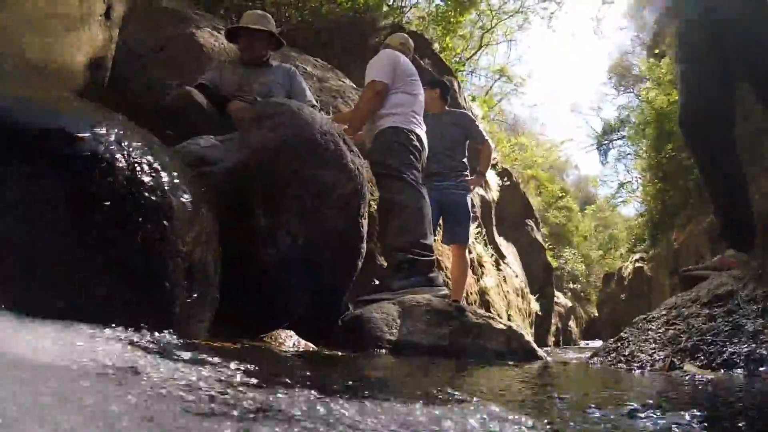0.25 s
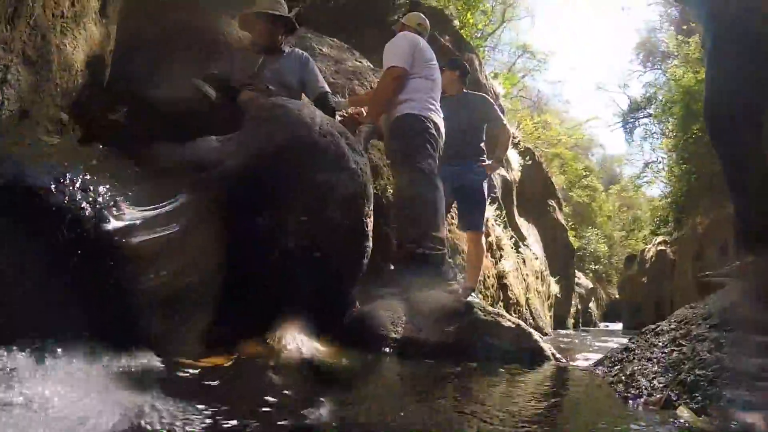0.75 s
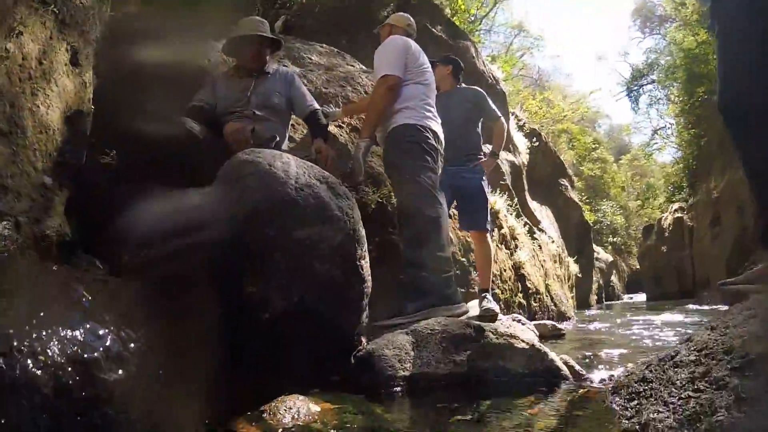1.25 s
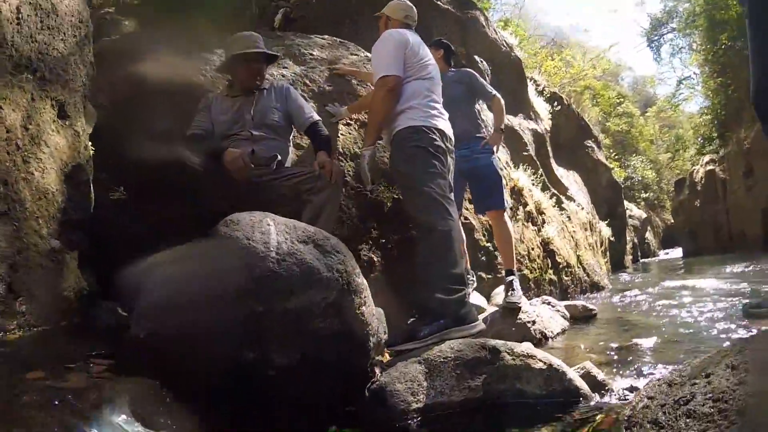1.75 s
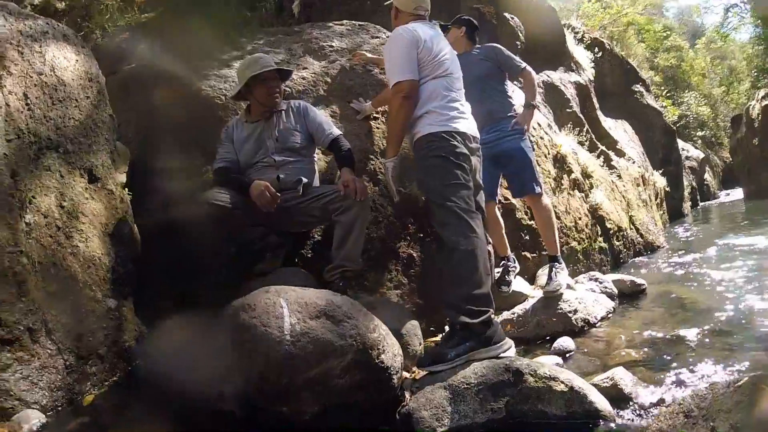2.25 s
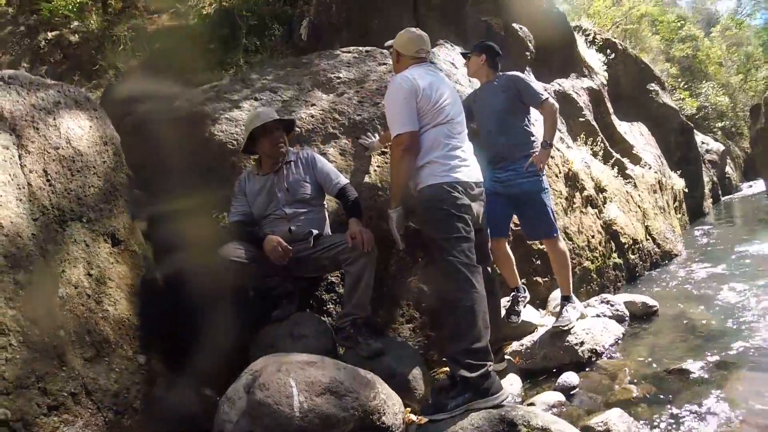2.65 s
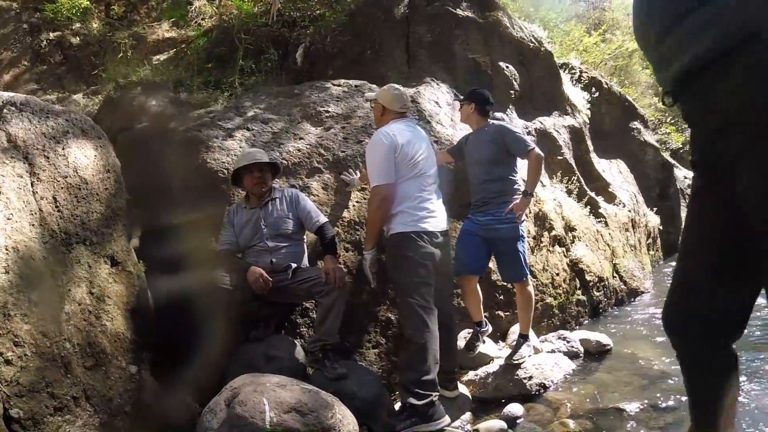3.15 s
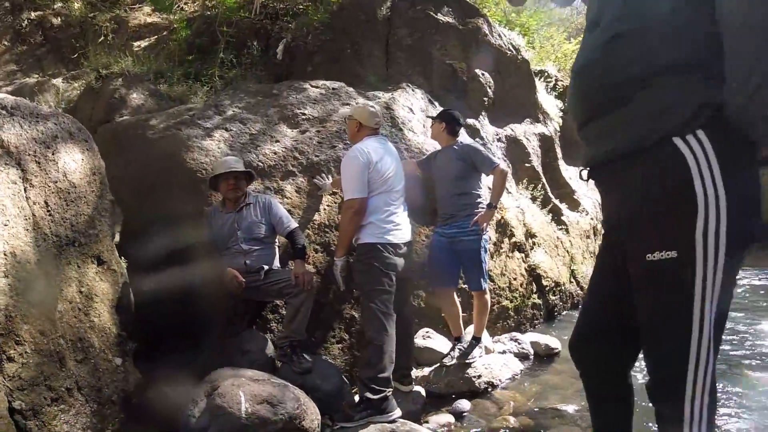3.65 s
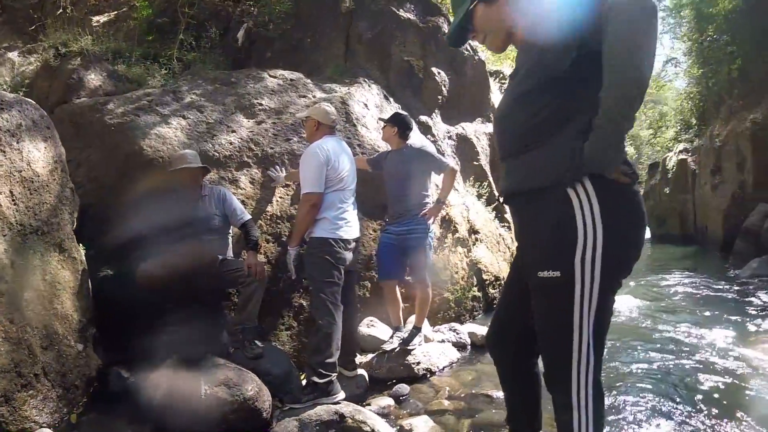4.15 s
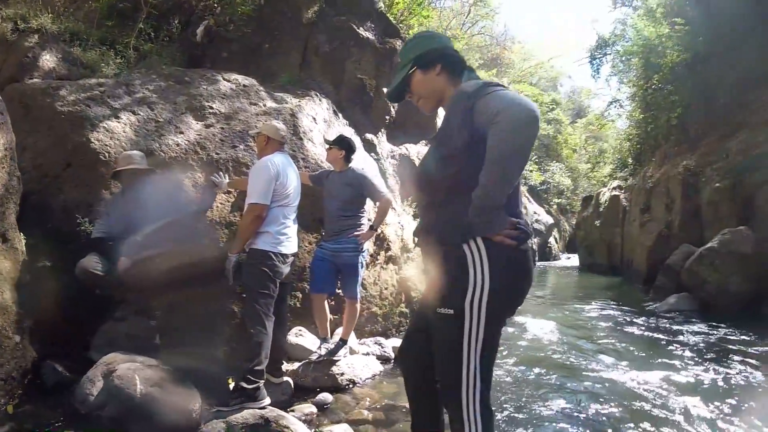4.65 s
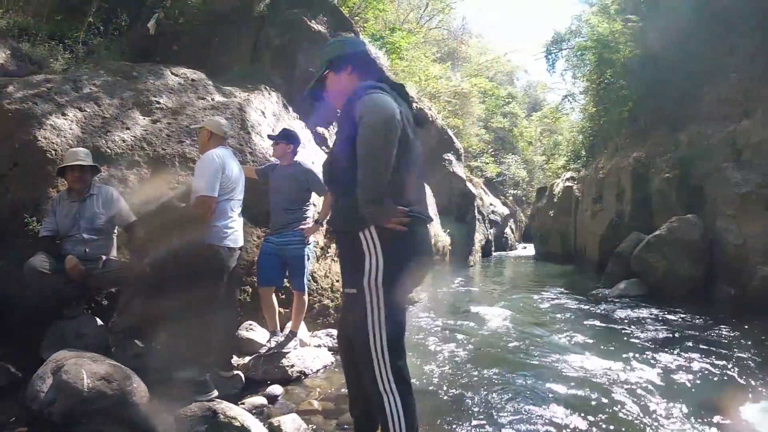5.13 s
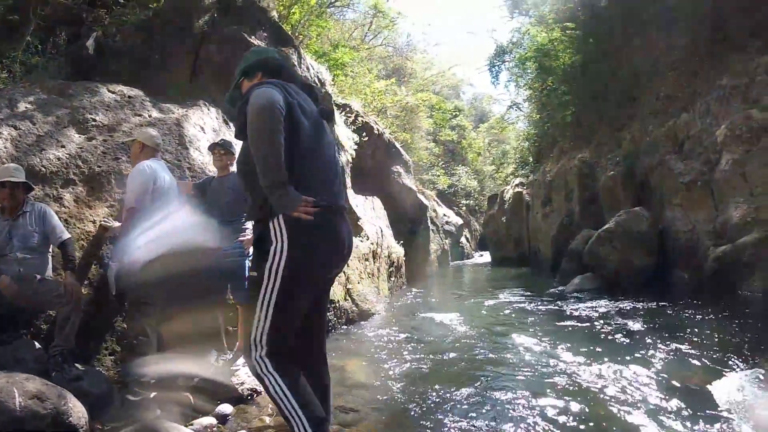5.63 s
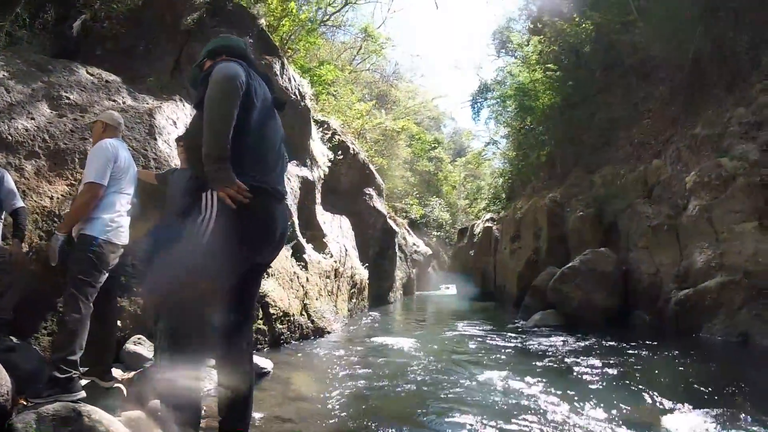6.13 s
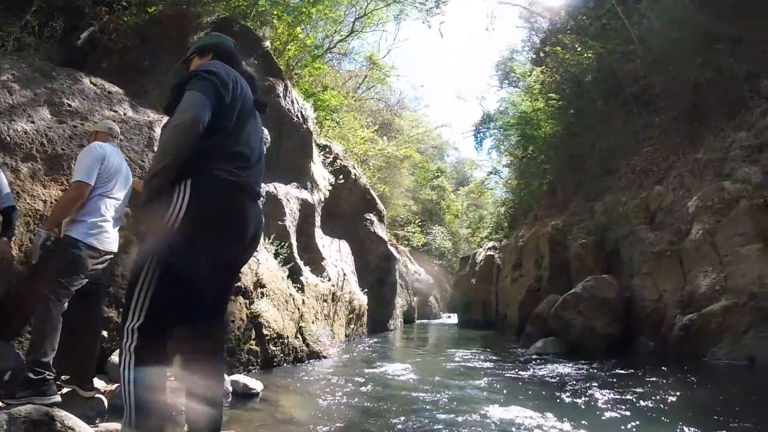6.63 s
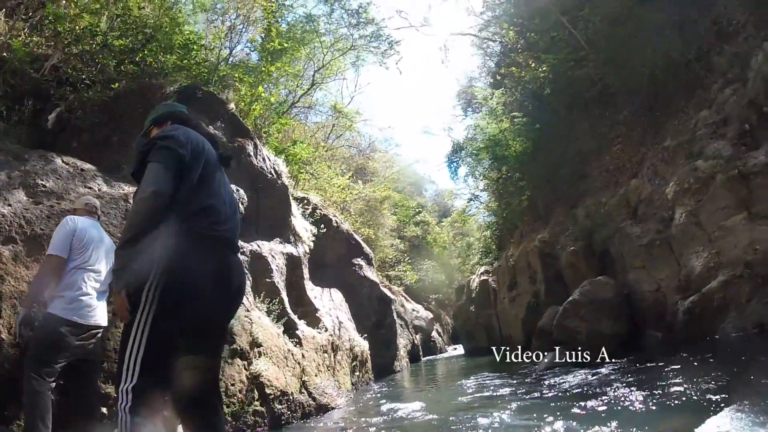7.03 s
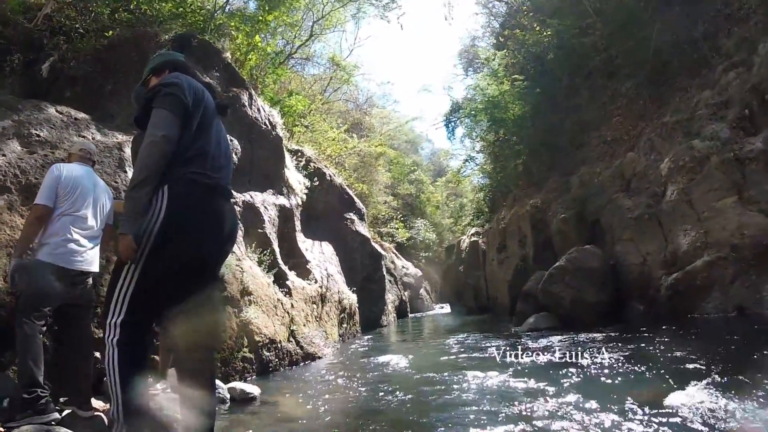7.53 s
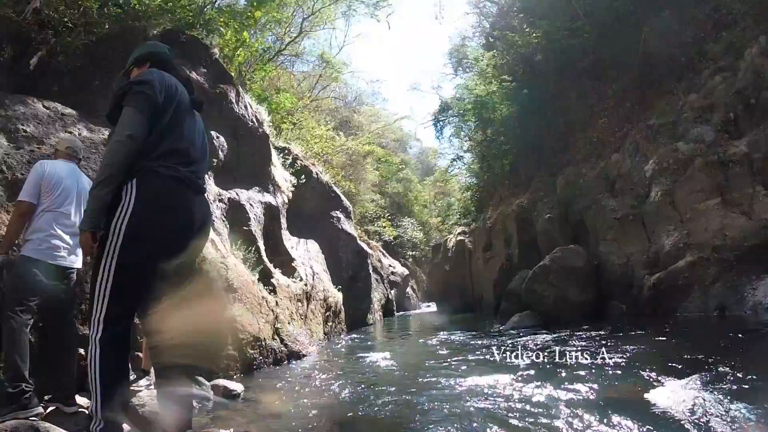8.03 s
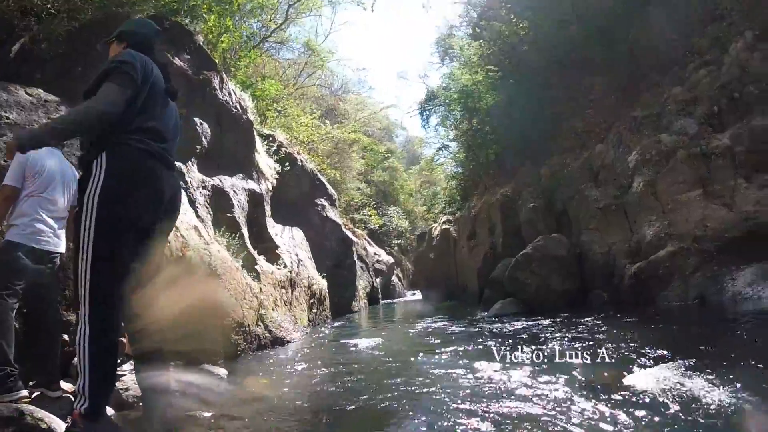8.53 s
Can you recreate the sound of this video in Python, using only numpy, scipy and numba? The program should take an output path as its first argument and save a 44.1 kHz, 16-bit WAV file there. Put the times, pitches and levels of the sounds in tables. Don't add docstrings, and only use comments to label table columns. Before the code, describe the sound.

Water-plugged microphone bubbles and rumbles dully, drains with rising hollow gurgles, then clears abruptly to airy river hiss, droplets ticking and low buffeting.

```python
import sys
import numpy as np
from scipy import signal
from scipy.fft import rfft, irfft
from scipy.io import wavfile
from scipy.ndimage import uniform_filter1d
from numba import njit

SR = 44100
rng = np.random.default_rng(int(sys.argv[2]) if len(sys.argv) > 2 else 0)


def store_pcm(level_fs):
    pcm = np.round(np.clip(level_fs, -1, 1) * 32767).astype(np.int16)
    wavfile.write(sys.argv[1], SR, np.atleast_2d(pcm).T)


def field_ratio(decibels):
    return 10 ** (np.asarray(decibels, dtype=float) / 20)


N = 387192
OPEN_S, BURST_S = 3.812, 3.8


def rms_one(x):
    return x / np.sqrt(np.mean(x ** 2) + 1e-20)


def in_time(rows):
    s, *columns = np.transpose(rows)
    return [np.interp(np.arange(N) / SR, s, c) for c in columns]


def ramp(start_s, length_s):
    return np.clip((np.arange(N) / SR - start_s) / length_s, 0, 1)


def drift(rate):
    r = np.exp(-40 * np.pi * rate / SR)
    slow = signal.lfilter([1], [1, -2 * r, r * r], rng.standard_normal(N // 20 + 4002))[4000:]
    return np.interp(np.arange(N) / 20, np.arange(len(slow)), rms_one(slow))


def colour(x, spectrum):
    size = 8192
    hz, level_db = np.transpose(spectrum)
    grid = np.maximum(np.fft.rfftfreq(size, 1 / SR), 1)
    cepstrum = irfft(np.log(field_ratio(np.interp(np.log(grid), np.log(hz), level_db))))
    cepstrum[1:size // 2] *= 2
    cepstrum[size // 2 + 1:] = 0
    pulse = irfft(np.exp(rfft(cepstrum)))
    return signal.oaconvolve(x, pulse / np.sqrt(np.sum(pulse ** 2)))[:N]


def band(x, low_hz, high_hz, order=2):
    return rms_one(signal.sosfilt(signal.butter(order, [low_hz, high_hz], "band", fs=SR, output="sos"), x))


def low_pass(x, hz, order=4):
    return signal.sosfilt(signal.butter(order, hz, fs=SR, output="sos"), x)


def steady(x, size):
    return x / np.sqrt(uniform_filter1d(x ** 2, size=size) + 1e-9 * np.mean(x ** 2))


@njit
def moving_peak(x, hz, width, rate):
    y, r = np.zeros(len(x)), np.exp(-np.pi * width / rate * np.ones(len(x)))
    for i in range(2, len(x)):
        y[i] = x[i] - x[i - 2] + 2 * r[i] * np.cos(2 * np.pi * hz[i] / rate) * y[i - 1] - r[i] ** 2 * y[i - 2]
    return y


def pops(per_s, spread_db):
    sizes = field_ratio(spread_db * np.minimum(rng.exponential(1, N), 4.5)) * rng.choice([-1, 1], N)
    return rms_one(sizes * (rng.random(N) < per_s / SR))


def white_water(flicker_db, rate, per_s, spread_db, pop_db):
    hiss = rng.standard_normal(N) * field_ratio(flicker_db * drift(rate))
    return rms_one(hiss + field_ratio(pop_db) * pops(per_s, spread_db))


def bubbles(per_s, low_hz, high_hz, cycles):
    clicks, sizes = pops(per_s, 2.5), rng.integers(0, 16, N)
    out = np.zeros(N)
    for k, hz in enumerate(np.geomspace(low_hz, high_hz, 16)):
        r, w = field_ratio(-60 * hz / (cycles * SR)), 2 * np.pi * hz / SR
        mine = clicks * (sizes == k) + 1e-18
        out += signal.lfilter([0, np.sin(w) * hz ** 0.48], [1, -2 * r * np.cos(w), r * r], mine)
    return rms_one(out)


def tones(events, rise):
    out = np.zeros(N)
    for s, peak_db, hz, t60 in events:
        t60 = np.clip(t60, .006, .15)
        t = np.arange(int(t60 * SR)) / SR
        shape = (1 - np.exp(-1.5 * t * hz)) * field_ratio(peak_db - 60 * t / t60)
        i = round(s * SR)
        out[i:i + len(t)] += (shape * np.sin(2 * np.pi * hz * t * (1 + rise * t / t60)))[:N - i]
    return out


def swells(events, rise, swell):
    out = np.zeros(N)
    for s, peak_db, hz, length in events:
        length = np.clip(length, .003, .03)
        t = np.arange(-int(1.2 * length * SR), int(2 * length * SR)) / SR
        side = length * np.where(t < 0, swell, .8)
        shape = field_ratio(peak_db) * np.exp(-(t / side) ** 2)
        i = round((s - .22 * length + t[0]) * SR)
        out[i:i + len(t)] += shape * np.sin(2 * np.pi * hz * t * (1 + rise * t / length))
    return out


def bursts(events, spectrum, decay_s):
    gate = np.zeros(N)
    gate[[round(s * SR) for s, db in events]] = field_ratio(np.array(events)[:, 1])
    gate = signal.lfilter([1], [1, -np.exp(-1 / (decay_s * SR))], gate + 1e-18)
    return colour(gate * rng.standard_normal(N), spectrum)


def port_rings(events, width_hz, decay_s):
    size = 600
    out, n = np.zeros(N + size), np.arange(size)
    for s, peak_db, hz in events:
        puff = rng.standard_normal(size) * np.exp(-n / (decay_s * SR)) * np.minimum(n / 90, 1)
        centre = np.full(size, 1.0 * hz)
        ring = moving_peak(moving_peak(puff, centre, width_hz, SR), centre, 2 * width_hz, SR)
        i = round(s * SR)
        out[i:i + size] += field_ratio(peak_db) * ring / np.max(abs(ring))
    return out[:N]


def cavity(hz, width_hz, skirt_hz):
    hz = hz * (1 + .03 * drift(9))
    water = white_water(2.5, 18, 90, 2.0, -6) * field_ratio(1.5 * drift(5))
    return steady(moving_peak(moving_peak(water, hz, width_hz, SR), hz, skirt_hz, SR), size=20000)


# (time [s], sway level [dB])
HAND_SWING = [(0.0, -31.5), (1.17, -20), (1.51, -39), (1.69, -14.5), (5.48, -34), (5.55, -21),
              (7.48, -33.5), (7.8, -13), (8.78, -11.5)]
# (time [s], flutter level [dB])
SLOSH_SHAKE = [(0, -22.5), (.55, -11), (.65, -19.5), (2.3, -17.5), (2.5, -10.5), (3.95, -11.5),
               (4.26, -23.5), (5.1, -27.5), (5.2, -17), (6.36, -25), (6.9, -14.5), (7.15, -15), (7.45, -22),
               (7.7, -17), (8.2, -23.5), (8.5, -11), (8.62, -45), (8.78, -15)]
# (time [s], flutter pitch [Hz])
FLUTTER_PITCH = [(0, 45), (.55, 14.4), (.9, 27), (2.2, 38.4), (2.45, 22), (3, 29.3), (3.35, 12.5),
                 (3.7, 27.6), (4, 15), (4.6, 9.6), (5.5, 14.7), (6.4, 29.6), (7, 41.7), (7.4, 22.5),
                 (8.78, 28.7)]
# (time [s], level [dB])
PORT_BUFFET = [(0, -17), (.2, -26), (.35, -16.5), (.45, -42), (.85, -27.5), (1.2, -28.5), (2.15, -30.5),
               (2.7, -31.5), (3.3, -40), (4.4, -38.5), (5.6, -37.5), (6.4, -33.5), (6.8, -25.5), (7.1, -29),
               (7.5, -36), (8.1, -27.5), (8.6, -29.5), (8.78, -28.5)]


def membrane_rocking():
    sway = steady(band(rng.standard_normal(N), 5, 14), size=12000)
    sway *= field_ratio(in_time(HAND_SWING)[0] + 4.3 * drift(1.07))
    flutter = moving_peak(rng.standard_normal(N), in_time(FLUTTER_PITCH)[0], 11.0, SR)
    flutter = steady(low_pass(band(flutter, 14, 48), 52), size=5000)
    flutter *= field_ratio(in_time(SLOSH_SHAKE)[0])
    buffet = band(rng.standard_normal(N) * field_ratio(3.36 * drift(19)), 24.0, 118.4)
    buffet *= field_ratio(in_time(PORT_BUFFET)[0])
    pause_s, pause_half_s = .36, .035
    free = 1 - .93 * np.exp(-((np.arange(N) / SR - pause_s) / pause_half_s) ** 4)
    return low_pass(free * (sway + flutter + buffet), 330)


# (time [s], peak level [dB], pitch [Hz], t60 [s])
WIND_GUSTS = [(6.026, -23, 87, 0.095), (6.175, -25, 88.8, 0.091), (6.562, -21, 80.7, 0.1),
              (6.661, -15, 61.9, 0.11), (6.737, -10, 78.1, 0.065), (6.917, -18, 61.5, 0.088),
              (7.04, -31, 72.7, 0.1), (7.123, -26, 61.9, 0.091), (7.277, -21, 88.8, 0.1),
              (7.343, -18, 70.0, 0.1), (7.448, -29, 80, 0.084), (7.585, -20, 61.9, 0.15),
              (7.809, -25, 61.9, 0.11), (7.929, -35, 91.5, 0.068), (8.064, -13, 68, 0.084),
              (8.197, -16, 61.9, 0.14), (8.276, -19, 61.9, 0.1), (8.448, -25, 80.7, 0.14)]


def wind_gusts():
    return low_pass(field_ratio(9.5) * tones(WIND_GUSTS, -.1), 300)


# (time [s], level [dB])
SEAM_CLEAR = [
    (.4, -31),
    (.7, -30),
    (1.25, -5.5),
    (2.55, -3),
    (2.9, -11),
    (3.9, -8),
    (4.25, 0),
    (4.7, -6),
    (6.5, -8),
    (8.1, -6.5),
]
# (frequency [Hz], level [dB per Hz])
SEAM_RESONANCE = [(9000, -43), (11200, -13.5), (12200, -1), (13200, -3.5), (14400, -13), (15000, -15),
                  (15400, -37.5)]
# (time [s], peak level [dB], pitch [Hz])
SEAM_DROPS = [(4.4566, -40.5, 11940), (4.7345, -42.5, 13000), (4.7809, -52, 12100), (4.8674, -42, 12400),
              (5.0417, -40, 12200), (5.144, -44, 12500), (5.1931, -37.5, 10260), (5.4583, -43.5, 10800),
              (5.8266, -39, 10300), (6.913, -46, 11200), (7.0997, -31.5, 12100), (7.2308, -37, 10000),
              (7.312, -41, 10430), (7.5286, -39.5, 11060), (7.6331, -48, 11800), (7.7895, -37.5, 10000),
              (8.039, -35, 10450), (8.6062, -45, 11800)]


def seam_leak():
    clear_db, = in_time(SEAM_CLEAR)
    lower = field_ratio(-66 + 0.25 * clear_db) * band(rng.standard_normal(N), 6030, 10040, order=4)
    lower *= 1 - ramp(OPEN_S, .01)
    top = field_ratio(-58.5 + clear_db) * colour(white_water(4.1, 24, 300, 3.0, -2.0), SEAM_RESONANCE)
    return top + lower + field_ratio(-5) * port_rings(SEAM_DROPS, 900.0, 0.003)


# (frequency [Hz], level [dB per Hz])
RIVER_SPECTRUM = [(300, -41), (550, 0), (1010, -2), (1400, 0), (1840, 0.5), (2180, -4.5), (2850, -17.5),
                  (3500, -18), (4100, -27.5), (4600, -48.5), (6000, -68.5), (16000, -85)]


def river_rush(near_db):
    t = np.arange(N) / SR
    rush = field_ratio(4) * colour(white_water(1.2, 29, 250, 6.9, -13.0), RIVER_SPECTRUM)
    rush += field_ratio(-1 + 2.5 * drift(5)) * low_pass(bubbles(160, 800, 2300, 18.0), 2600)
    hollow = rms_one(moving_peak(white_water(3.3, 27, 80, 2.5, -10), np.full(N, 1400.0), 200.0, SR))
    hollow_db = np.interp(t, [6.6, 7.4, 8.3, 8.6], [-20.0, -2.5, 3.0, -25])
    rush += field_ratio(hollow_db) * low_pass(hollow, 2370)
    rush *= field_ratio(near_db - 10 * np.exp(-abs(t - BURST_S) / 0.052))
    roar = low_pass(band(white_water(0.4, 13.0, 200, 6.9, -10.5), 110, 575), 2500)
    roar *= field_ratio(-34.5 - 0.51 * (t - BURST_S) + 1)
    return ramp(3.636, 0.73) * (rush + roar)


# (time [s], peak level [dB])
STONE_SLAPS = [
    (4.04, -37),
    (4.335, -34),
    (4.36, -37),
    (5.6, -29.5),
]


def wavelet_slaps():
    return bursts(STONE_SLAPS, RIVER_SPECTRUM, 0.026)


# (time [s], level [dB])
EDDY_BOOM = [
    (4.3, -49),
    (4.6, -43),
    (5.7, -42),
    (6.0, -61),
]


def eddy():
    return field_ratio(in_time(EDDY_BOOM)[0]) * cavity(np.full(N, 311.0), 100.0, 250.0)


# (time [s], peak level [dB], pitch [Hz], t60 [s])
SMALL_RIVER_BUBBLES = [(4.5148, -31, 1440, 0.038), (4.5992, -30, 1760, 0.057), (4.8241, -25, 1960, 0.025),
                       (5.1923, -17, 1390, 0.018), (5.53, -19, 1440, 0.016), (5.7793, -16, 1560, 0.02),
                       (5.8733, -21.5, 1520, 0.025), (6.183, -23, 1200, 0.027), (6.3023, -25.5, 1035, 0.07),
                       (6.621, -20, 1340, 0.034), (7.3602, -19, 1890, 0.015), (7.433, -35, 1490, 0.025),
                       (7.5044, -27, 1390, 0.028), (7.6891, -16.5, 1430, 0.021), (8.094, -33, 1330, 0.021),
                       (8.214, -22.5, 1470, 0.023)]
# (time [s], peak level [dB], pitch [Hz], t60 [s])
LARGE_RIVER_BUBBLES = [(4.518, -21, 584, 0.045), (4.591, -24, 380, 0.04), (5.093, -33, 404, 0.037),
                       (5.599, -15.5, 360, 0.038), (5.833, -20.5, 634, 0.031), (6.301, -19.5, 774, 0.034),
                       (6.769, -27, 530, 0.045), (6.872, -24, 547, 0.04), (7.118, -23, 614, 0.04),
                       (7.504, -19, 650, 0.044), (8.489, -36, 486, 0.031)]


def river_bubbles():
    return tones(SMALL_RIVER_BUBBLES, 0.089) + tones(LARGE_RIVER_BUBBLES, .1)


def patchy_spray(patchy_db, rate):
    edges, hiss = np.geomspace(3000, 16000, 8), np.zeros(N)
    for low, high in zip(edges, edges[1:]):
        flicker = field_ratio(patchy_db * drift(rate) + drift(2.4))
        hiss += band(rng.standard_normal(N), low, high) * np.sqrt(high - low) * flicker
    return rms_one(rms_one(hiss) * field_ratio(1.3 * drift(25)) + field_ratio(-10) * pops(300, 3.3))


# (frequency [Hz], level [dB per Hz])
SPRAY_SPECTRUM = [(3500, -60), (4800, -1), (5250, -5), (5700, -4), (6400, 2), (7100, 8.5), (8300, 5),
                  (9400, -5), (11300, -10.5), (14400, -29), (16000, -45)]


def spray_hiss(near_db, port_hz):
    spray = patchy_spray(2.65, 120)
    port = rms_one(moving_peak(moving_peak(spray, port_hz, 940.0, SR), port_hz, 1100.0, SR))
    spray = field_ratio(-1.5) * rms_one(colour(spray, SPRAY_SPECTRUM)) + field_ratio(-11.5) * band(port, 4500, 13000)
    wet_loss_db, drying_s = 9.5, .3
    wet_db = wet_loss_db * np.exp(-np.maximum(np.arange(N) / SR - OPEN_S, 0) / drying_s)
    return ramp(OPEN_S, 0.011) * field_ratio(near_db - 2.6 - wet_db) * spray


# (time [s], pitch [Hz], level [dB])
WET_PORT_MODE = [
    (3.85, 5820, -57),
    (4.4, 6000, -47),
    (5.3, 5920, -50),
    (6.1, 5780, -43),
    (6.7, 5820, -51.5),
    (7.7, 5420, -48.5),
    (8.3, 5800, -50),
    (8.78, 5950, -53),
]


def wet_mode():
    hz, level_db = in_time(WET_PORT_MODE)
    ring = moving_peak(patchy_spray(4.8, 40), hz, 700.0, SR)
    return ramp(OPEN_S, .012) * field_ratio(level_db - 5.0) * band(ring, 5130, 6700, order=4)


# (time [s], level under the port resonance [dB])
DRYING_FILM = [
    (4.0, -61),
    (5.4, -59),
    (6.9, -48.5),
    (7.9, -48.5),
    (8.78, -53.5),
]


def film_gap():
    after = np.arange(N) / SR > 4
    return after * field_ratio(in_time(DRYING_FILM)[0] - 3.0) * band(white_water(2.3, 46, 160, 4.0, -1.5), 3270, 5300)


# (time [s], peak level [dB], pitch [Hz])
PORT_DROPS = [(3.8417, -35.5, 7200), (4.0458, -27.5, 6550), (4.1266, -32, 7100), (4.3341, -28, 6240),
              (4.5511, -27, 6830), (4.6205, -30.5, 6980), (4.6793, -31, 7000), (4.7148, -32, 7180),
              (4.9228, -24.5, 7700), (5.0171, -40, 7080), (5.0919, -30, 7130), (5.1802, -30.5, 6670),
              (5.246, -27.5, 7990), (5.3528, -24.5, 6850), (5.699, -48.5, 7260), (5.7584, -24, 7500),
              (5.7793, -30, 7250), (5.8257, -23, 7600), (5.8557, -23, 7550), (5.8961, -33, 7170),
              (5.9894, -36.5, 7100), (6.0298, -23.5, 7420), (6.0961, -28, 7800), (6.1121, -23.5, 7350),
              (6.151, -32, 7340), (6.2034, -21.5, 7330), (6.4593, -33.5, 7070), (6.6528, -29, 6660),
              (6.8289, -26.5, 7520), (6.8753, -27, 6730), (6.9182, -27.5, 7060), (6.9337, -24, 6980),
              (7.1233, -30.5, 7000), (7.3767, -31.5, 6900), (7.4934, -26, 6800), (7.5279, -31, 7000),
              (7.6351, -28, 6930), (7.6895, -28, 7000), (7.7533, -30, 7060), (7.7923, -21, 7100),
              (7.8806, -25, 7270), (7.9684, -24, 7360), (8.0192, -26.5, 7220), (8.0457, -20, 6980),
              (8.14, -34.5, 6920), (8.1674, -21, 7660), (8.2158, -28, 7470), (8.2382, -17, 7350),
              (8.2976, -28.5, 7060), (8.3131, -19, 7300), (8.3585, -22.5, 7370), (8.3829, -29, 7100),
              (8.4812, -24, 7080), (8.5001, -24.5, 6970), (8.5465, -34.5, 7000), (8.6224, -26, 7080),
              (8.6753, -22.5, 7300), (8.7491, -23, 7560)]


def port_drops():
    return field_ratio(-3) * low_pass(port_rings(PORT_DROPS, 940.0, 0.0024), 9900)


# (time [s], nearness of the rapids [dB], port resonance [Hz])
RAPIDS_NEARNESS = [
    (3.8, -46, 6900),
    (4.5, -41.5, 7160),
    (4.95, -40, 7040),
    (5.58, -41, 6990),
    (5.9, -39.5, 7360),
    (6.4, -40, 6990),
    (6.93, -39, 6920),
    (7.9, -38.5, 7380),
    (8.5, -39.5, 7500),
    (8.78, -43, 7460),
]


def open_port():
    near_db, port_hz = in_time(RAPIDS_NEARNESS)
    air = river_rush(near_db) + spray_hiss(near_db, port_hz) + film_gap() + wet_mode()
    notch_hz, notch_width_hz = 4750, 1200
    air -= .68 * signal.lfilter(*signal.iirpeak(notch_hz, notch_hz / notch_width_hz, SR), air)
    return air + eddy() + river_bubbles() + port_drops() + wavelet_slaps()


def lull():
    start_s = 0.27
    return field_ratio(-4 * ramp(start_s, 0.0058) * (0.5 - ramp(start_s, 0.18)))


# (frequency [Hz], level [dB per Hz])
PLUG_SPECTRUM = [(500, -7), (1000, 2), (1500, -17), (2000, -18.5), (2640, -23.5), (3500, -33),
                 (4200, -39.5), (6000, -42.5), (13000, -110)]


def plug_hiss():
    thick_db, thin_db, thin_at_s = -55, -49, 2.44
    hiss_db = thick_db + (thin_db - thick_db) * ramp(0, thin_at_s) + 2.1 * drift(0.75)
    hiss = field_ratio(hiss_db + 8.0) * colour(white_water(2.0, 36, 180, 6.3, -23.5), PLUG_SPECTRUM)
    crackle = band(2 * pops(90, 2.5) + rng.standard_normal(N), 4500, 5500)
    return lull() * hiss + field_ratio(-79 + 2 * drift(3)) * crackle


def pool_slosh(vigour_db):
    water_db = vigour_db - 1 - 0.84 * (np.arange(N) / SR - 1.5)
    slosh = field_ratio(water_db) * band(white_water(3.35, 14.6, 150, 1.0, -9.0), 150, 743)
    babble = field_ratio(water_db - 12 + 3.5 * drift(6)) * low_pass(bubbles(150, 350, 1500, 22.0), 1700)
    return slosh + lull() * ramp(.08, .15) * babble


# (time [s], pitch [Hz], level [dB])
UPPER_POCKET = [
    (.2, 1310, -41),
    (.33, 1050, -23.5),
    (1.0, 1230, -21),
    (1.75, 1290, -20),
    (2.7, 1540, -27.5),
    (2.9, 1390, -26),
    (3.9, 1270, -40),
]


def air_cavities(vigour_db, low_hz):
    high_hz, high_db = in_time(UPPER_POCKET)
    low = field_ratio(vigour_db - 5.0) * cavity(low_hz, np.maximum(70, low_hz * 0.69 - 385), low_hz)
    high = field_ratio(high_db - 16.5) * cavity(high_hz, 0.38 * high_hz, 500.0) * lull()
    under = field_ratio(-37) * (1 - ramp(2.1, 0.29)) * cavity(np.full(N, 261.0), 44.0, 140.0)
    return low + high + under


# (centre time [s], peak level [dB], pitch [Hz], length [s])
LARGE_GURGLES = [(0.045, -20.5, 756, 0.026), (0.051, -24, 790, 0.015), (0.102, -15, 476, 0.0056),
                 (0.12, -21, 680, 0.02), (0.147, -19, 624.0, 0.0063), (0.195, -16, 660, 0.0062),
                 (0.232, -18, 602.0, 0.0043), (0.267, -14.5, 400, 0.0073), (0.282, -18.5, 553, 0.011),
                 (0.475, -22, 790, 0.028), (0.479, -34, 740, 0.021), (0.497, -21, 613, 0.013),
                 (0.544, -22.5, 645.0, 0.0081), (0.623, -23.5, 555, 0.018), (0.649, -28, 544, 0.02),
                 (0.691, -19, 460, 0.014), (0.717, -20, 484, 0.013), (0.726, -18, 784, 0.0035),
                 (0.758, -22, 476, 0.0075), (0.966, -23.0, 425, 0.016), (0.998, -19.5, 403, 0.015),
                 (1.142, -23, 463, 0.011), (1.179, -23, 567, 0.0075), (1.262, -26.0, 597, 0.01),
                 (1.291, -26, 538.0, 0.0074), (1.354, -23, 452.0, 0.008), (1.396, -21, 830, 0.0068),
                 (1.416, -20, 818.0, 0.0037), (1.418, -20, 520, 0.008), (1.612, -22.5, 625, 0.015),
                 (1.644, -17, 513, 0.0057), (1.69, -25, 490, 0.024), (1.86, -22, 710.0, 0.014),
                 (1.926, -25.0, 516.0, 0.011), (2.278, -19.5, 660, 0.0085), (2.301, -20, 534, 0.0061),
                 (2.373, -25, 581.0, 0.011), (2.419, -17, 587, 0.0086), (2.634, -22, 624.0, 0.014),
                 (2.685, -21, 620, 0.011), (2.702, -22, 602.0, 0.016), (2.764, -21.5, 633, 0.012),
                 (2.988, -26.5, 820, 0.013), (3.254, -21, 818.0, 0.0053), (3.435, -20.5, 820, 0.0069)]
# (centre time [s], peak level [dB], pitch [Hz], length [s])
SMALL_PLINKS = [(0.102, -24, 950, 0.003), (0.234, -25.5, 1033.0, 0.011), (0.29, -22, 1170, 0.0054),
                (0.488, -24, 1291.0, 0.0057), (0.492, -21.0, 990.0, 0.006), (0.733, -17, 1200, 0.0031),
                (0.761, -24, 1210, 0.0074), (0.762, -30, 1464.0, 0.0077), (0.851, -26.0, 1580, 0.0055),
                (0.905, -18.5, 1250, 0.007), (0.95, -16.5, 1030, 0.0052), (1.066, -22, 1090, 0.016),
                (1.119, -28, 1240, 0.014), (1.157, -29, 1248.0, 0.0084), (1.23, -26.5, 1300, 0.011),
                (1.331, -21, 1378.0, 0.0096), (1.432, -30, 1378.0, 0.013), (1.484, -19, 905, 0.0034),
                (1.574, -26, 1190, 0.009), (1.602, -23, 1150, 0.0081), (1.608, -23.5, 1375, 0.012),
                (1.643, -20, 1150, 0.0053), (1.71, -21.5, 960, 0.0084), (1.757, -15, 1130, 0.0066),
                (1.785, -25, 1640, 0.006), (1.911, -22.5, 1440, 0.006), (1.969, -28, 1460, 0.0069),
                (2.026, -28, 1560, 0.0063), (2.119, -23, 925.0, 0.0068), (2.142, -26, 1210, 0.0091),
                (2.184, -25.0, 1280, 0.0096), (2.252, -25, 1291.0, 0.0066), (2.375, -32, 1378.0, 0.0082),
                (2.418, -30, 1480, 0.0095), (2.56, -29, 1560, 0.0086), (2.865, -35, 1440, 0.019),
                (3.34, -28, 930, 0.011), (3.396, -25, 965, 0.016), (3.506, -25, 940, 0.0089),
                (3.75, -24, 1240, 0.0066), (3.756, -27, 920, 0.014)]
# (centre time [s], peak level [dB], pitch [Hz], length [s])
POCKET_POP = [
    (.344, -23, 1250, .004),
    (.3545, -17, 1150, .003),
    (.355, -17, 650, .004),
    (.3655, -10, 1170, .003),
    (.368, -13, 720, .005),
    (.3765, -4.5, 850, .004),
    (.3855, -19, 850, .006),
    (.397, -23, 820, .005),
    (.404, -23, 800, .006),
    (.42, -22, 790, .008),
]


def gurgles():
    plug_bubbles = swells(LARGE_GURGLES, 0.017, .2) + swells(SMALL_PLINKS, 0.017, .2)
    return field_ratio(-0.5) * plug_bubbles + swells(POCKET_POP, .01, .6)


# (time [s], peak level [dB])
HOUSING_DROPS = [(0.06, -46), (0.2181, -41), (0.484, -52), (0.6481, -47), (1.0427, -46.5), (1.1983, -46.5),
                 (1.413, -58), (1.5765, -60), (1.7566, -49), (2.236, -45), (2.74, -46), (2.9708, -54)]
# (frequency [Hz], level [dB per Hz])
HOUSING_SPECTRUM = [(800, -42.5), (2600, 7), (3500, -8.5), (4500, -10), (5400, -23.5), (7000, -15),
                    (9000, -30), (12000, -30), (16000, -62)]


def housing_drops():
    return field_ratio(3.5) * bursts(HOUSING_DROPS, HOUSING_SPECTRUM, 0.0015)


# (time [s], gurgle vigour [dB], low cavity pitch [Hz])
DRAINING_PLUG = [
    (0, -32, 700),
    (.3, -27.5, 595),
    (.45, -33, 796),
    (.7, -33.5, 498),
    (1.8, -30.5, 560),
    (2.1, -35, 520),
    (2.5, -31.5, 590),
    (2.85, -33, 655),
    (3.75, -31.5, 1060),
    (4.3, -52, 1210),
]


def plugged_port():
    vigour_db, low_hz = in_time(DRAINING_PLUG)
    left = 1 - ramp(3.91, 0.53)
    water = left * (pool_slosh(vigour_db) + air_cavities(vigour_db, low_hz))
    return left * plug_hiss() + low_pass(water + gurgles(), 1940) + housing_drops()


# (time [s], peak level [dB], pitch [Hz], t60 [s])
HOUSING_KNOCKS = [
    (.036, -9, 120, .04),
    (.3345, -2, 105, .05),
    (.2165, -33, 2450, .015),
    (2.738, -8, 200, .05),
    (8.152, -33, 3200, .03),
]
# (centre time [s], peak level [dB], pitch [Hz], length [s])
POCKET_HEAVE = [
    (.3728, -3.5, 40, .016),
]
# (time [s], peak level [dB], pitch [Hz], t60 [s])
HOUSING_GLUGS = [
    (0.531, -17.5, 345, 0.052),
    (0.63, -8.5, 340, 0.029),
    (0.703, -14, 210, 0.057),
    (0.822, -21, 172, 0.071),
    (0.943, -18, 206, 0.13),
    (1.054, -13, 320, 0.016),
    (1.197, -29, 234, 0.081),
    (1.48, -11.5, 185, 0.05),
    (1.845, -33, 161, 0.041),
    (2.205, -21, 275, 0.085),
]


def housing_thuds():
    heave = low_pass(swells(POCKET_HEAVE, 0, .6), 900)
    return tones(HOUSING_KNOCKS, 0.016) - heave + low_pass(tones(HOUSING_GLUGS, 0.078), 1200)


def scene():
    pushed = -.34 * np.exp(-np.arange(N) / (0.0087 * SR))
    around = membrane_rocking() + wind_gusts() + seam_leak() + open_port()
    return (pushed + around + plugged_port() + housing_thuds())[None]


def band_limit(x):
    return signal.sosfilt(signal.butter(12, 15290, fs=SR, output="sos"), x)


def record(dry):
    mix = np.clip(dry, -.975, .975)
    return band_limit(mix)


dry = scene()
out = record(dry)
store_pcm(out)
```